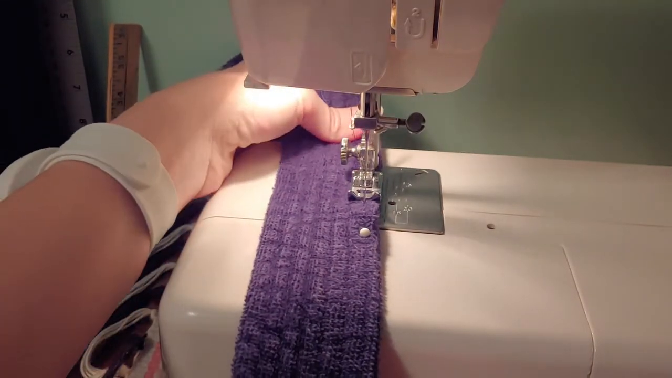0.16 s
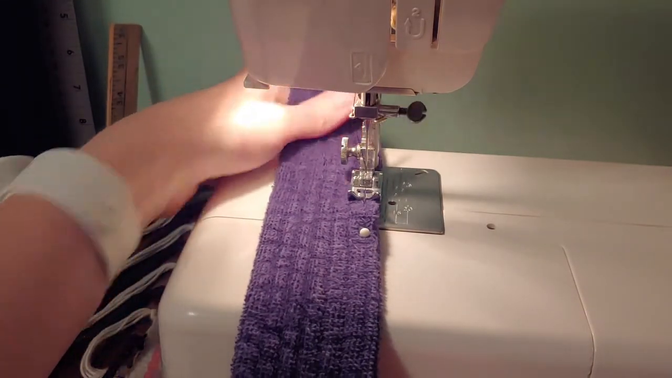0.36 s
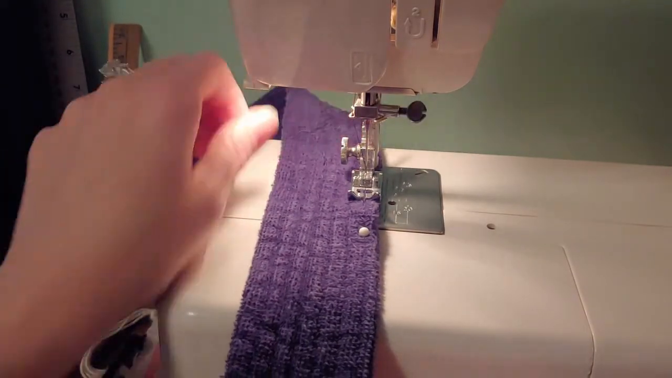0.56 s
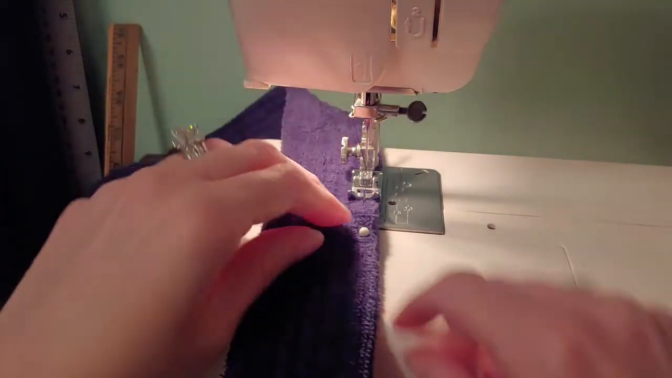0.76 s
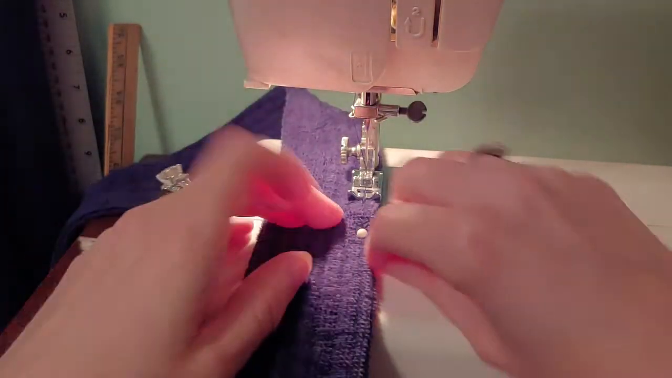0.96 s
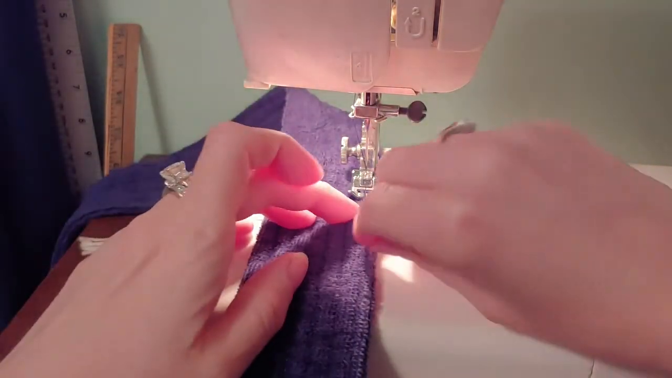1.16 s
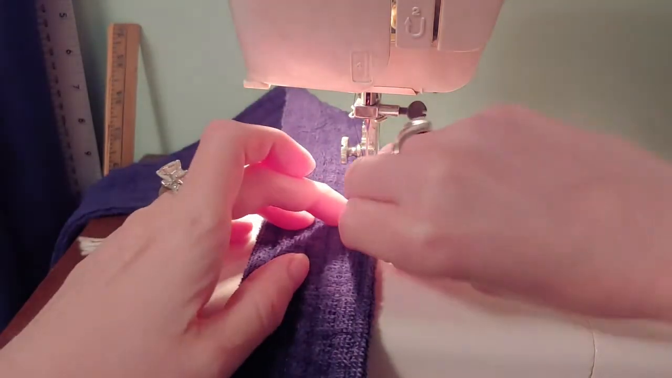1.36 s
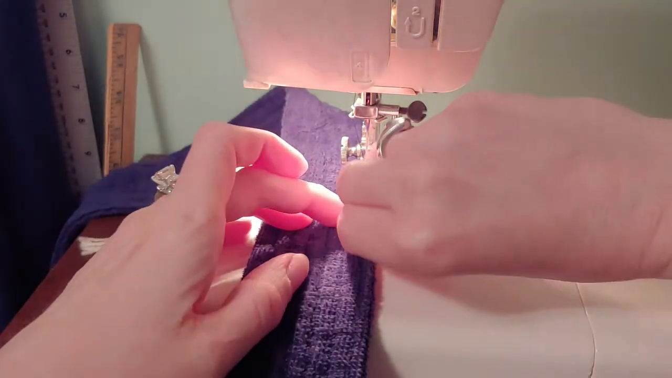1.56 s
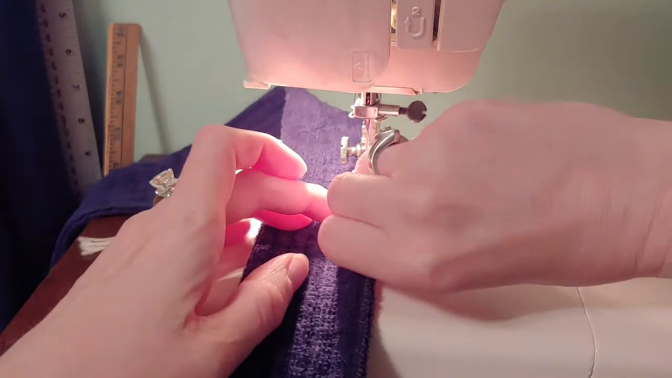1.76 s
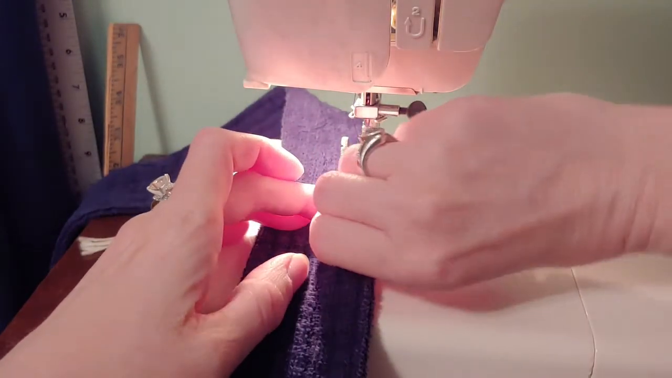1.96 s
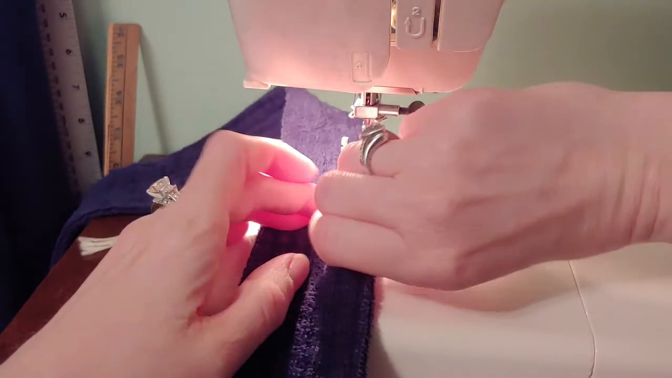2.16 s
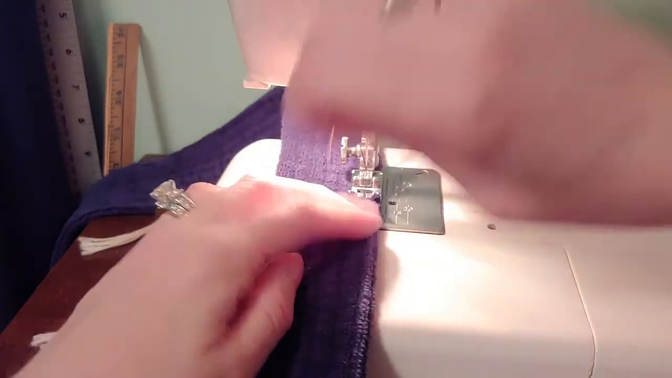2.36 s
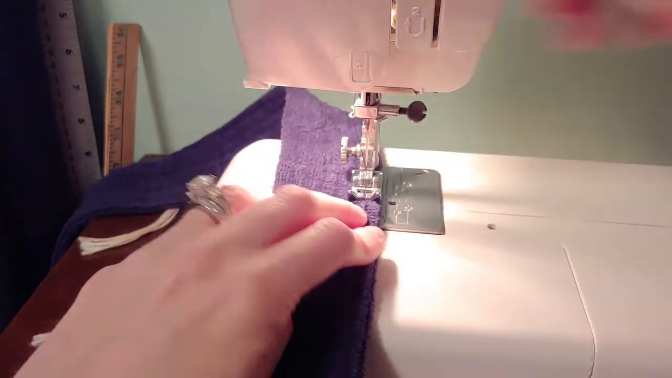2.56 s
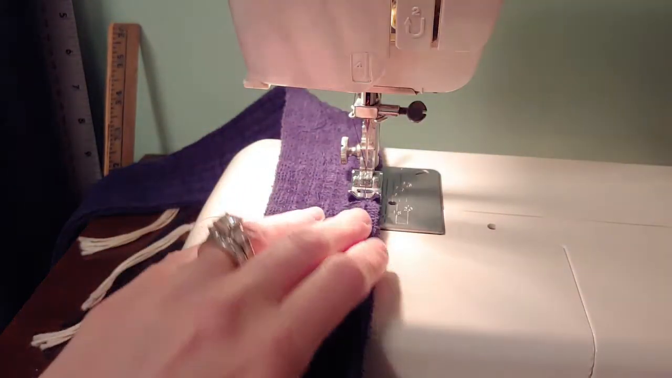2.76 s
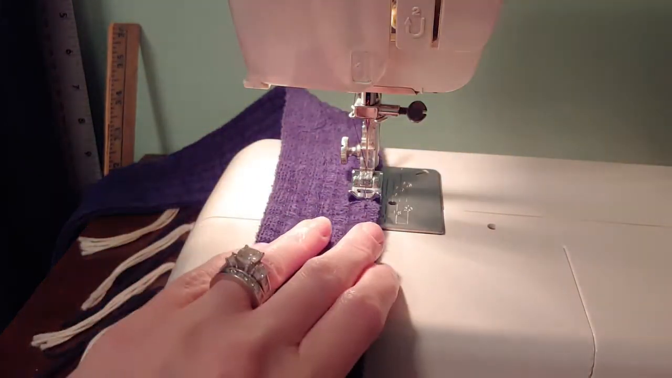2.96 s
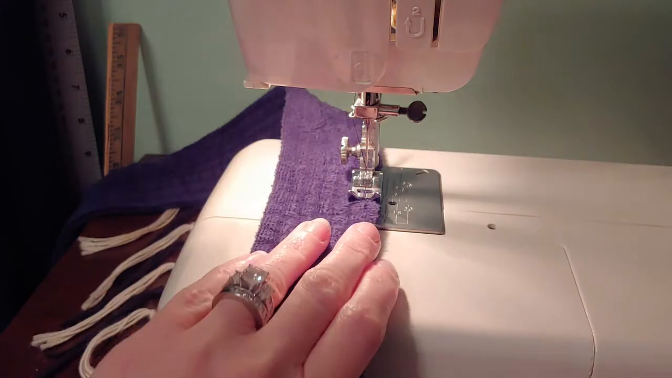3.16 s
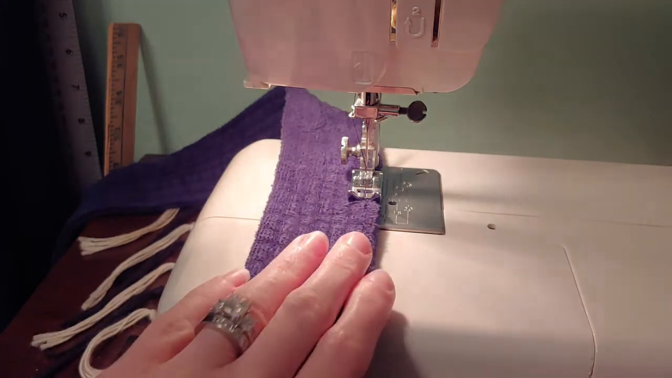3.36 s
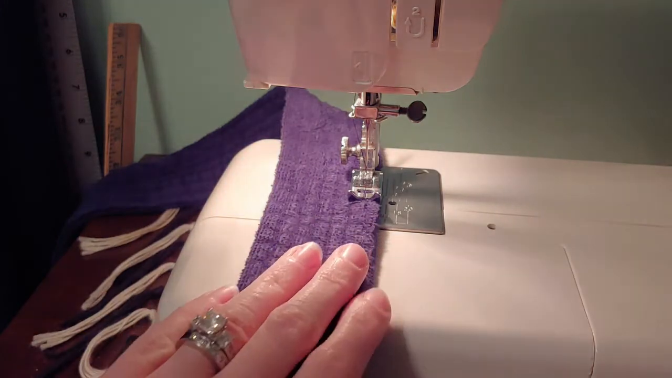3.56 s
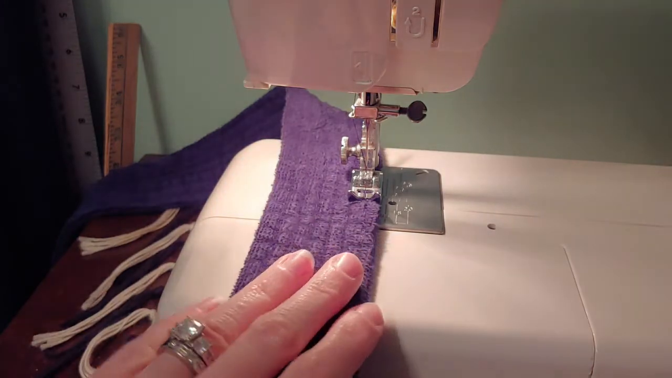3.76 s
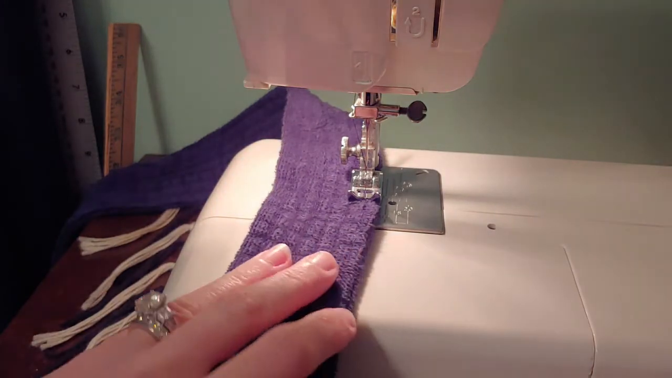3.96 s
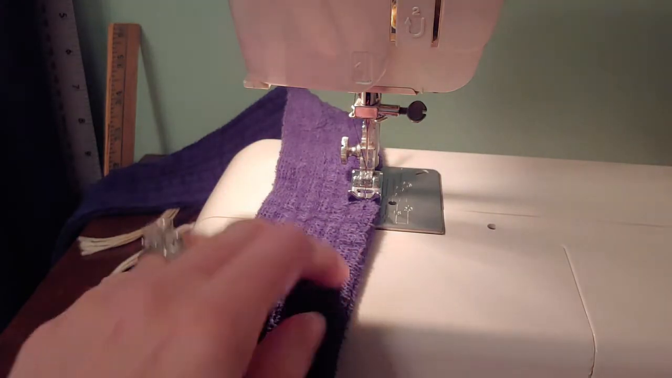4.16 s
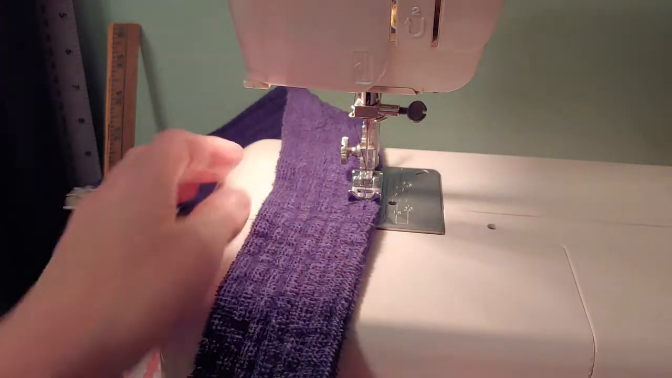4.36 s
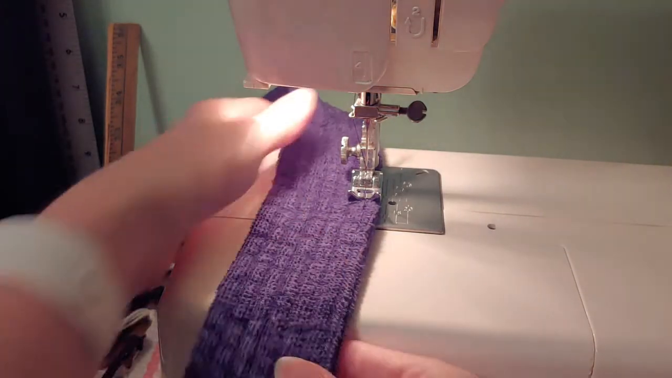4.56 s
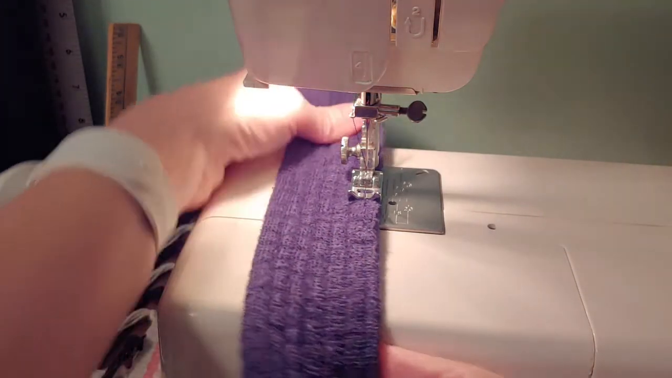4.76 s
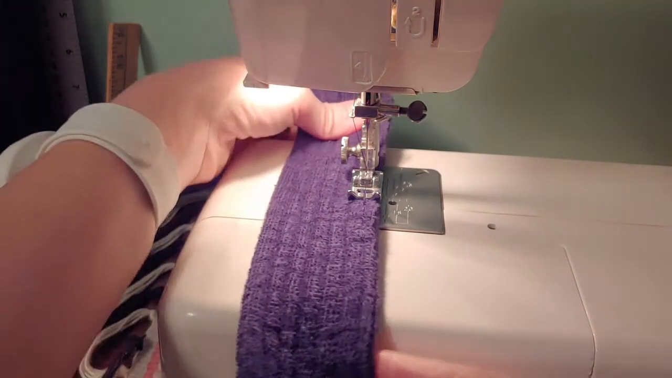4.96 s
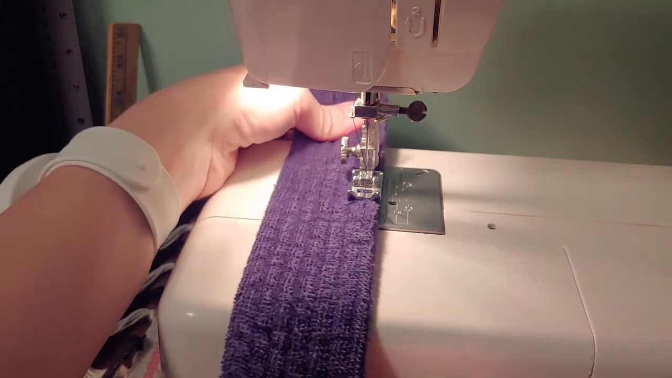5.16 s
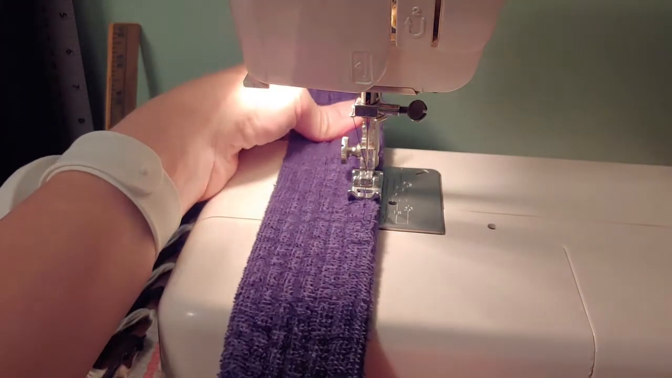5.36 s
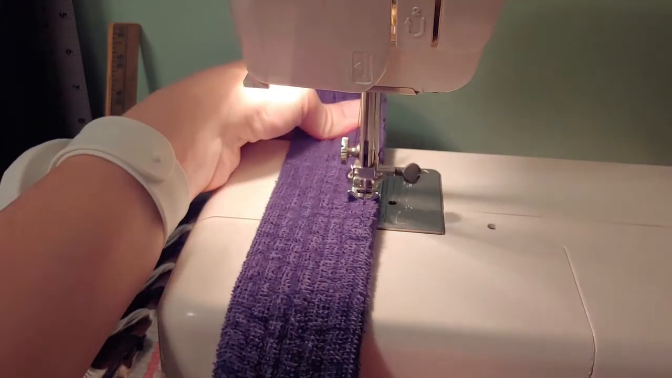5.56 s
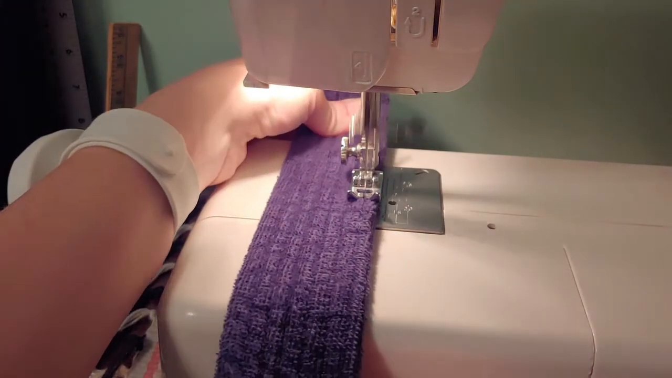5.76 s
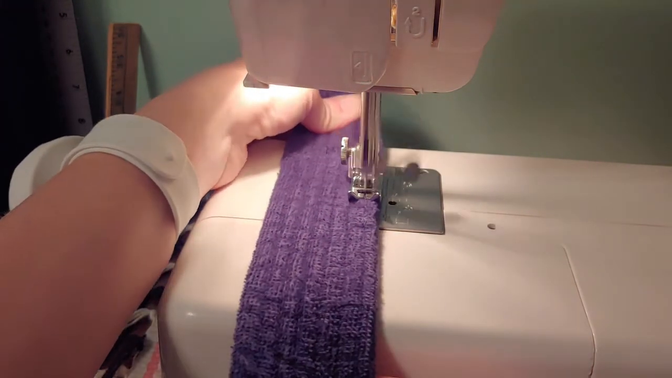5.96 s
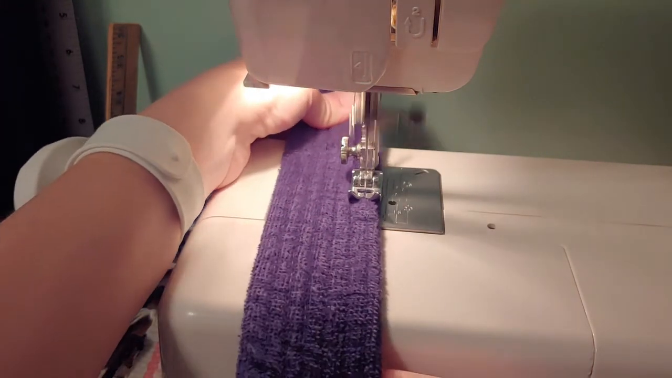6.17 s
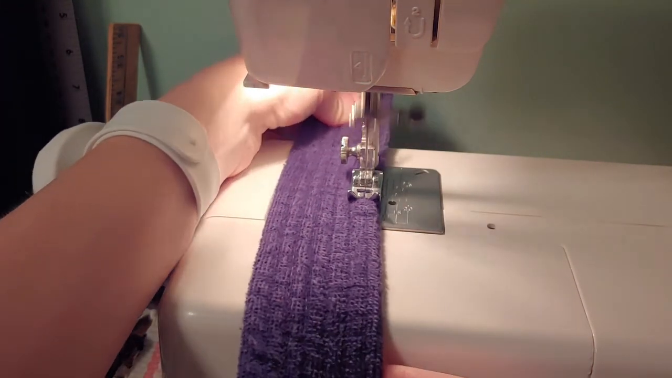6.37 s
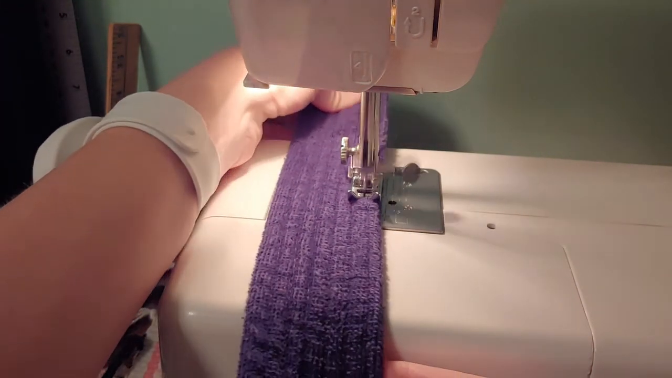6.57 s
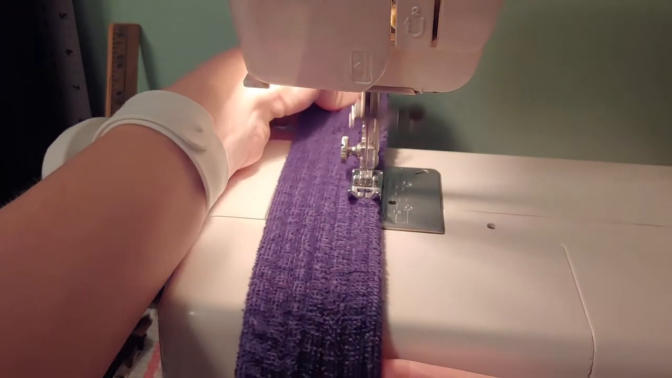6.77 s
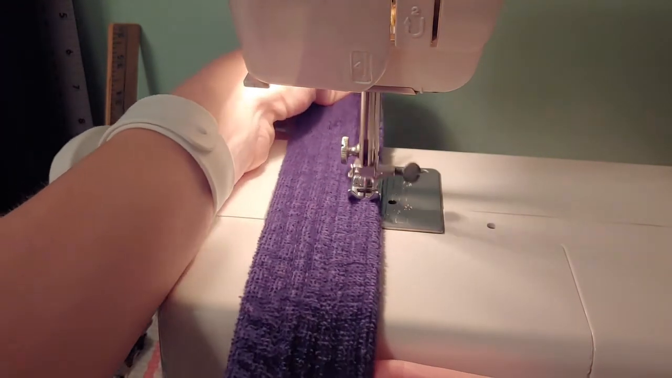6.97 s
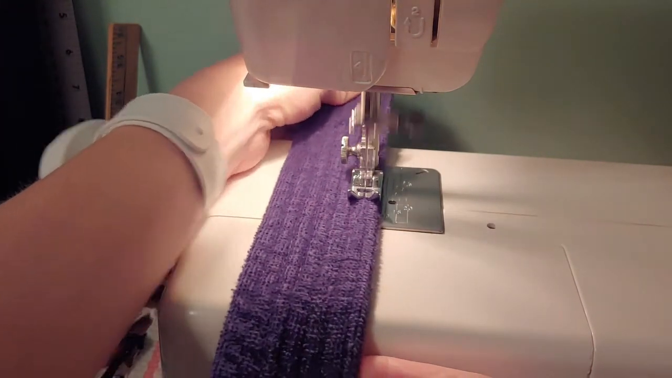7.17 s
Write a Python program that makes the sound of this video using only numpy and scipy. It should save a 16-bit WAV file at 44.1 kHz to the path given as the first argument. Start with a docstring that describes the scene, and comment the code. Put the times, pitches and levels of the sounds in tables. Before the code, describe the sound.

An electric sewing machine close to the microphone in a small quiet room. Its motor gives a short strained buzz, ending with a hard clack. Hands then knock the casing, bump the table and brush cloth softly, with a tiny bright rattle of pins. A lever snaps sharply, and after a pause the motor growls up into fast, loud, clanking stitches that continue to the end.

```python
"""A household sewing machine on a table, heard from close by in a quiet room.
Its motor buzzes once without turning, then later strains, runs up and stitches: magnetic pulls and
rough gears shake the casing, the table thumps and metal parts clack, click and knock every turn.
Before that, hands knock the casing, brush cloth, bump the table, rattle pins in a dish and snap a lever.
Blows are noise bursts through the casing's resonances; cloth and room air are coloured noise."""
import sys
import numpy as np
from scipy import signal
from scipy.fft import rfft, irfft, next_fast_len
from scipy.io import wavfile
from scipy.ndimage import uniform_filter1d

SR = 44100
rng = np.random.default_rng(int(sys.argv[2]) if len(sys.argv) > 2 else 0)


def store_wav(level_fs):
    """Save 16-bit WAV to argv[1]."""
    pcm = np.round(np.clip(np.atleast_2d(level_fs), -1, 1) * 32767)
    wavfile.write(sys.argv[1], SR, pcm.T.astype(np.int16))


N = 318402
SIZE = next_fast_len(N + SR)   # FFT length, with space for echoes after the end
HZ = np.maximum(np.arange(SIZE // 2 + 1) * SR / SIZE, 1)   # frequency of every FFT bin

# difference between left and right, against the middle: (frequency [Hz], level [dB])
WIDTH = [(60, -9), (110, -34.5), (200, -11.5), (380, -12.5), (700, -3), (1290, -2.5), (2380, -0.5),
         (4400, -1), (8120, 0), (15000, -1)]
# one row a stitch: (needle bar clack [s], its treble [dB], its low part [dB], chatter around it [dB],
# table thump peak [dB], hook click after the clack [s], hook click [dB], feed knock [dB]);
# all but the thump are levels to which each kind of contact adds its own band levels
STITCHES = [(5.5083, -35, -15.5, -33, -43, 0.052, -28, -18),
            (5.6323, -12, -10.5, -12, -11, 0.061, -18.5, -20),
            (5.7941, -10.5, -9, -13, -2.5, 0.035, -17, -22),
            (5.9266, -11, -8.5, -14.5, -3, 0.038, -13, -24), (6.0472, -11, -8, -45, -11, 0.034, -11, -29),
            (6.1635, -10.5, -7, -29, -3, 0.031, -11.5, -27), (6.2724, -9, -6, -19, -4, 0.035, -10.5, -15),
            (6.3901, -7, -11, -33, -4.5, 0.044, -42, -14),
            (6.5106, -12.5, -2.5, -13, -3, 0.039, -10.5, -6.5),
            (6.6422, -8.5, -5, -43, -12.5, .041, -8.5, -8), (6.778, -10.5, -21, -13.5, -9, 0.04, -8.5, -7),
            (6.9204, -10, -7, -14.5, -4, 0.04, -14, -6.5),
            (7.0646, -9.5, -0.5, -17.5, -5.5, 0.041, -10, -10.5),
            (7.2134, -6.5, 7, -32, -10, 0.057, -40, -20)]


def amp(db):
    """Gain of a dB value."""
    return 10 ** (np.asarray(db) / 20)


def rms_one(x):
    """Scaled to rms 1."""
    return x / np.sqrt(np.mean(x ** 2) + 1e-20)


def at_hz(points):
    """A (frequency, value) table read at every FFT bin, straight lines over log frequency."""
    hz, value = np.array(points).T
    return np.interp(np.log(HZ), np.log(hz), value)


def through(x, response):
    """Filtered by a frequency response."""
    return irfft(rfft(x, SIZE) * response, SIZE)[..., :N]


def band(x, low_hz, high_hz):
    """Butterworth band-pass."""
    return signal.sosfilt(signal.butter(2, [low_hz, high_hz], "band", fs=SR, output="sos"), x)


def resonance(hz, width_hz, at=HZ):
    """Second-order band-pass response of one ringing part, gain 1 on top."""
    return 1 / (1 + 1j * (at ** 2 - hz ** 2) / (at * width_hz))


def modes(table, at=HZ):
    """Several resonances side by side, signs alternating."""
    return sum((-1) ** k * amp(db) * resonance(hz, width, at) for k, (hz, width, db) in enumerate(table))


def casing(at=HZ):
    """The machine's casing rings at its modes, over a smooth part that dulls at the top."""
    # casing and frame modes: (frequency [Hz], width [Hz], level [dB])
    casing_modes = [(121, 26.4, 4), (299, 22.2, 11.5), (356.5, 69, 1.5), (409.2, 55.5, 6),
                    (494.5, 67, -1.5), (552, 32, 2.5), (617, 5.7, -10), (741, 35, -15), (976, 79, -9),
                    (1212, 64, -0.5), (1234, 140, -9), (1448, 79, -8), (1482, 68, -7.5), (1845, 70, -1.5),
                    (1886, 68, -4), (2121, 56, -4.5), (2340, 36, -29.5), (2770, 50, -6.5),
                    (3150, 32, -16.5), (3670, 17, -4), (3841, 70, -7.5), (3788, 70, -4), (4210, 94, -20),
                    (4996, 220, -5), (5960, 14, -14)]
    between_db, top_hz = -11.5, 7300
    return modes(casing_modes, at) + amp(between_db) / (1 + 1j * at / top_hz)


def drift(rate_hz):
    """Slow random wandering with spread 1; a higher rate wanders faster."""
    knots_per_s = 400
    knots = rng.standard_normal(int(N / SR * knots_per_s) + 2)
    r = np.exp(-2 * np.pi * rate_hz / knots_per_s)
    slow = rms_one(signal.lfilter([1], [1, -2 * r, r * r], knots))
    return np.interp(np.arange(N) / SR * knots_per_s, np.arange(len(knots)), slow)


def spells(table, rise_s, fall_s):
    """Gain that swells in before each start, holds and fades after each end."""
    t = np.arange(N) / SR
    gain = np.zeros(N)
    for start, end, db in table:
        before = np.maximum(start - t, 0) / rise_s
        after = np.maximum(t - end, 0) / fall_s
        gain += amp(db) * np.exp(-before ** 2 - after ** 2)
    return gain


def random_taps(per_s, spread_db):
    """Single-sample taps at random times, with uneven strength."""
    return (rng.random(N) < per_s / SR) * amp(spread_db * np.minimum(rng.exponential(1, N), 4))


def swings(table):
    """A soft push sets the table swinging for a few cycles, its pitch rising a little."""
    push_s, lag_s, swing_s = 0.006, 0.002, 0.02
    t = np.arange(SR // 4) / SR
    out = np.zeros(N + SR)
    for s, db, hz in table:
        push = 1 - np.exp(-(t / push_s) ** 2)
        dying = np.exp(-(t / swing_s) ** 2) + 0.24 * np.exp(-t / 0.034)
        # the pitch starts at 0.91 of hz and rises through it
        swing = -np.sin(2 * np.pi * hz * 0.91 * t * (1 + 4.0 * t)) * push * dying
        out[round((s + lag_s) * SR):][:len(t)] += amp(db) * swing / np.abs(swing).max()
    return out[:N]


def strikes(table, crack, crack_s, favour_db):
    """Each contact is a crack and a dying rattle in the casing, with its own weight band by band."""
    # low, middle, high and top band: (lower edge [Hz], upper edge [Hz])
    band_edges = [(260, 830), (700, 2730), (2500, 8800), (8500, 16500)]
    # ring time as a multiple of the contact's t60, for those bands and the part above the middle mode
    band_ring = [1.3, 1.2, 0.97, 0.75, 0.96]
    # frame mode that every blow favours: (frequency [Hz], width [Hz], level [dB])
    frame_ring = (4200, 200, -12)
    favoured_width_hz = 89
    size = 8192
    t = np.arange(size) / SR
    out = np.zeros((2, N + size))
    at = np.maximum(np.arange(size // 2 + 1) * SR / size, 1)
    shell = casing(at)
    for row in table:
        s, low_db, middle_db, high_db, top_db, rise, t60, low_hz, middle_hz, pan_db = row
        noise = rng.standard_normal(size)
        # where it is struck decides which modes stand out
        favoured = [(low_hz, favoured_width_hz, 0), (middle_hz, favoured_width_hz, 0), frame_ring]
        body = shell * (1 + amp(favour_db) * modes(favoured, at))
        onset = 1 - np.exp(-t / max(rise, 1e-4))
        # the middle band is split a little above its favoured mode
        bottom, (start, end), *upper = band_edges
        split = min(1.207 * middle_hz, 0.9 * end)
        edges = [bottom, (start, split), *upper, (split, end)]
        above_mode_db = (middle_db + high_db) / 2 - 2.5
        weights_db = [low_db, middle_db, high_db, top_db, above_mode_db]
        hit = 0
        for (low, high), ring, weight_db in zip(edges, band_ring, weights_db):
            rattle = amp(-60 * t / (max(t60, 0.005) * ring))
            push = noise * onset * (rattle + crack * np.exp(-t / crack_s))
            ringing = irfft(rfft(push) * body, size)
            part = band(band(ringing, low, high), low * 0.8, high * 1.2)
            hit = hit + amp(weight_db) * part / np.abs(part).max()
        first = round(s * SR)
        out[:, first:first + size] += hit * amp([[pan_db / 2], [-pan_db / 2]])
    return out[:, :N]


def air():
    """Room rumble is coloured noise; wavering appliance hum is a few sines that drift."""
    # rumble colour: (frequency [Hz], level [dB])
    air_colour = [(12, -34), (20, -0.5), (60, -0.5), (177, -4), (248, -7.5), (410, -17), (573, -22),
                  (2190, -31.5), (6180, -38.5), (7100, -72), (8880, -43.5), (12100, -46.5), (16000, -48.5)]
    # hum: (frequency [Hz], typical rms level [dB])
    hum_tones = [(59.2, -64), (96.9, -74), (177.6, -73), (355.3, -74.5), (414.5, -75)]
    air_db = -63.5
    t = np.arange(N) / SR
    rumble = amp(air_db) * rms_one(through(rng.standard_normal(N), amp(at_hz(air_colour))))
    hum = np.zeros(N)
    for hz, db in hum_tones:
        level = np.sqrt(2) * amp(db + 2.0 * drift(2.7))
        hum += level * np.sin(2 * np.pi * hz * t + 0.5 * drift(0.56))
    return rumble + hum


def cloth():
    """Brushing cloth, and the noise dying away after the lever snaps: swells of fine uneven noise."""
    # swells of soft broadband noise: (start [s], end [s], level [dB])
    swells = [(.24, .36, -69), (.45, .52, -56), (.82, 1.07, -79), (1.5, 1.54, -85), (2.67, 2.7, -75),
              (2.85, 2.99, -70), (3.17, 3.25, -79), (3.34, 3.46, -72), (3.56, 3.6, -76), (3.7, 3.85, -74.5),
              (3.97, 4.07, -75), (4.29, 4.31, -80), (4.72, 4.85, -63.5), (4.94, 4.97, -65.5),
              (5.23, 5.27, -68), (5.33, 5.36, -74)]
    # colour of the noise: (frequency [Hz], density [dB per Hz])
    cloth_colour = [(290, -19.5), (500, -4), (570, -8.5), (649, -10.5), (1460, -14.5), (1590, -13.5),
                    (6140, -19), (6990, -23.5), (8570, -26), (16000, -33.5)]
    rest_db = -81   # faint constant level beneath the swells
    level = amp(rest_db) + spells(swells, rise_s=0.074, fall_s=0.028)
    brushing = rms_one(through(rng.standard_normal(N), amp(at_hz(cloth_colour))))
    return level * amp(0.72 * drift(18.0)) * brushing


def fidget():
    """Tiny random fingertip taps ring one hollow mode of the casing."""
    # spells of fidgeting: (start [s], end [s], level [dB])
    fidgeting = [(.82, 1.37, -76.5), (1.47, 1.56, -77.5)]
    mode_hz, mode_width_hz = 1240, 93
    taps = random_taps(per_s=90, spread_db=3.6)
    ringing = rms_one(through(taps, resonance(mode_hz, mode_width_hz) ** 2))
    return spells(fidgeting, rise_s=0.037, fall_s=0.054) * ringing


def pins():
    """Pins rattling in a dish to the left: short bright noise through the dish's modes."""
    # rattles: (time [s], starting level [dB], time to fall by 60 dB [s])
    pin_rattles = [(3.6062, -43.5, 0.016), (3.666, -51, 0.18), (3.687, -30.5, 0.11), (3.6918, -33, 0.036),
                   (3.697, -31.5, 0.023), (3.704, -38, 0.03), (3.7204, -45, 0.049)]
    # modes of the dish: (frequency [Hz], width [Hz], level [dB])
    dish_modes = [(2900, 250, -8), (3900, 240, 0), (5460, 700, 3), (6400, 500, 0), (6700, 220, -7.5),
                  (7760, 1200, -2), (9800, 860, -1), (11500, 270, 4.5), (13400, 2000, -11)]
    pan_db, low_hz = 9.5, 2600   # left above right; bottom of the rattle
    t = np.arange(N) / SR
    shake = np.zeros(N)
    for s, db, t60 in pin_rattles:
        shake += (t >= s) * amp(db - 60 * np.maximum(t - s, 0) / max(t60, 0.004))
    rattle = band(through(rng.standard_normal(N), modes(dish_modes) + amp(-34.0)), low_hz, 18000)
    return shake * rms_one(rattle) * amp([[pan_db / 2], [-pan_db / 2]])


def bumps():
    """Arms bump the table dully, and each bump sets it swinging."""
    # bumps: (time [s], peak level [dB], nominal pitch [Hz]);
    # the swing starts at 0.91 of the nominal pitch and rises
    arm_bumps = [(0.36, -32.5, 129), (0.52, -39.5, 89), (0.972, -30, 166), (1.029, -36.5, 222),
                 (1.267, -50, 54.3), (1.646, -40, 148), (1.751, -57, 70.0), (2.307, -43, 180),
                 (2.599, -52, 57.6), (3.328, -46.5, 138), (3.666, -43, 60), (3.72, -53, 56),
                 (4.517, -47.5, 147), (4.741, -32, 169), (5.306, -35.5, 152)]
    return swings(arm_bumps)


def knocks():
    """Hands, a ring and the lever strike the casing: a strong short crack, then a brief ring."""
    # blows: (time [s], low band [dB], middle band [dB], high band [dB],
    # loudest low mode [Hz], loudest middle mode [Hz], left above right [dB])
    blows = [(.095, -32.5, -68, -76, 296, 950, 0), (0.152, -32, -40, -56, 467, 969, -4),
             (0.181, -40, -68, -42, 420, 1900, 0), (0.271, -38, -47, -39, 480, 1910, 0),
             (0.414, -17, -21, -34, 483, 1640, 0.5), (.431, -29.5, -29, -37, 536, 1640, 3),
             (.446, -33, -29, -37, 480, 1520, 0), (.895, -36, -42.5, -55.5, 450, 1210, 2),
             (.909, -35.5, -37.5, -50.5, 530, 1260, -2), (0.954, -25.5, -33, -59, 515, 1240, -2),
             (0.97, -20.5, -21.5, -31.5, 394, 986, 2), (.992, -30, -32.5, -40.5, 490, 1250, -3),
             (1.018, -43, -62, -73, 417, 953, 6), (1.041, -47, -53, -77, 480, 1220, 3.5),
             (1.266, -34, -40, -67, 470, 1240, -1), (1.462, -53, -73, -78, 417, 1240, -1),
             (1.492, -53, -60.5, -76, 415, 1270, 1), (1.567, -52, -65, -68, 490, 1090, 2.1),
             (1.638, -35.5, -70, -59, 535, 960, 2), (1.647, -36, -43, -70, 300, 1140, 3),
             (2.2472, -43, -36, -39.5, 328, 1730, -2.5), (2.256, -41, -37, -42, 490, 2200, 2),
             (2.318, -39.5, -47, -61.5, 294, 1180, -1), (2.599, -54, -62.5, -78, 318, 1650, -1.1),
             (3.285, -53.5, -75, -72, 270, 2240, -3.5), (4.057, -40.5, -55, -75, 530, 1200, 0),
             (4.494, -57, -59.5, -66, 417, 894, -5), (4.531, -56, -65, -67, 417, 942, -3),
             (4.7363, -11, -6.5, -11.5, 470, 1450, -1.5), (4.743, -17, -11.5, -24.5, 434, 1620, -3),
             (4.764, -24, -34, -31, 416, 1420, 4), (4.953, -65, -64, -51, 428, 1240, 14),
             (5.18, -56, -54, -68.5, 247, 794, 7), (5.313, -39.5, -66, -57, 371, 1040, 5)]
    top_db, rise_s, t60_s = -19, 0.0002, 0.043   # top band above the high one; t60 before band ring
    rows = []
    for s, low_db, middle_db, high_db, *rest in blows:
        rows.append((s, low_db, middle_db, high_db, high_db + top_db, rise_s, t60_s, *rest))
    return strikes(rows, crack=4.9, crack_s=0.00081, favour_db=13.0)


def growl(pull, locked):
    """Regular magnetic pulls and irregular rumble shake the casing's low modes."""
    body = casing()
    buzz = rms_one(band(through(pull * amp(3.0 * drift(40.0)), body), 95, 700))
    rough = rng.standard_normal(N) * amp(4.7 * drift(41.0))
    rumble = rms_one(band(through(rough, body + 0.4), 73, 607))
    return np.sqrt(locked) * buzz + np.sqrt(1 - locked) * rumble


def whirr(pull, locked, turning):
    """Rough gear teeth hiss and rattle in their play, louder as the needle drives through."""
    # colour of the gear noise: (frequency [Hz], density [dB per Hz])
    whirr_colour = [(290, -8.5), (500, 7.5), (718, -4), (807, -5.5), (1950, -11.5), (2360, -16.5),
                    (4870, -18), (5630, -22.5), (7100, -29.5), (8690, -30), (11600, -33), (16000, -58)]
    stroke_db, stroke_lead_s, stroke_s = 6.5, 0.0031, 0.015   # load peaks just before each clack
    rattle_db, dull_hz = -8.5, 2460   # rattle level above the hiss; dulling before the shaft turns
    t = np.arange(N) / SR
    load = sum(np.exp(-((t - row[0] + stroke_lead_s) / stroke_s) ** 2) for row in STITCHES)
    teeth = amp(stroke_db * load) * rng.standard_normal(N)
    teeth = teeth * (1 + 2.2 * locked * pull) * amp(2.0 * drift(45.0))
    body = casing()
    hiss = rms_one(through(teeth, amp(at_hz(whirr_colour)) * (1 + 0.95 * body)))
    play = random_taps(per_s=140, spread_db=3.9) * rng.choice([-1, 1], N)
    bright = hiss + amp(rattle_db) * rms_one(band(through(play, body), 360, 2420))
    dull = through(bright, 1 / (1 + 1j * HZ / dull_hz))
    return (1 - turning) * dull + turning * bright


def singing(pull):
    """A few loose parts ring while the motor strains, driven by noise that swells with each pull."""
    # loose parts: (frequency [Hz], width [Hz], level [dB])
    loose_parts = [(745, 40, -6), (1000, 50, -5), (1500, 50, -8), (1940, 130, 0), (2220, 50, -4),
                   (2670, 60, -5), (3390, 55, -8), (4260, 110, -16)]
    # spells of singing: (start [s], end [s], level [dB])
    sings = [(.18, .33, -57), (5.315, 5.39, -56), (5.4, 5.49, -64)]
    tone = rms_one(through(rng.standard_normal(N) * (1 + pull), modes(loose_parts) ** 2))
    return tone * spells(sings, rise_s=0.004, fall_s=0.024)


def motor():
    """Magnetic pulls at twice the mains rate and rough gear contact shake the casing."""
    # two spells of straining before the shaft turns: (time [s], low growl [dB], gear whirr [dB])
    strain = [
        [(0.088, -41.5, -70), (0.096, -38.5, -95), (0.148, -38.5, -49), (0.182, -32, -30), (0.204, -34, -33.5),
         (0.308, -32.5, -37), (0.4, -42.5, -56), (0.41, -30.5, -58)],
        [(5.3, -47, -78), (5.316, -39, -70), (5.372, -36, -66), (5.486, -28.5, -42), (5.5, -21.5, -44)],
    ]
    # motor running: (time [s], low growl [dB], gear whirr [dB])
    run = [(5.51, -24.5, -34.5), (5.562, -19, -22), (5.68, -18, -24.5), (5.738, -22, -22.5),
           (5.972, -22.5, -24), (6.186, -18.5, -21.5), (6.562, -25.5, -22), (6.934, -21.5, -23),
           (7.22, -25.5, -24)]
    pull_hz, spin_up_s = 122.1, 0.063   # two pulls a mains cycle; time for the whirr to brighten
    t = np.arange(N) / SR
    s, growl_db, whirr_db = np.transpose(np.vstack(strain + [run]))
    on = sum((t > part[0][0]) & (t < part[-1][0] + 0.011) for part in strain + [run])
    on = uniform_filter1d(np.minimum(on, 1.0), size=400)   # softens the switching
    run_start = run[0][0]
    locked = np.where(t < run_start, 0.3, 0.09)   # share of the growl's power locked to the mains
    turning = np.clip((t - run_start) / spin_up_s, 0, 1)
    cycles = pull_hz * t + 0.025 * drift(20.0)
    pull = np.exp(7.0 * (np.cos(2 * np.pi * cycles) - 1))   # one narrow pulse a cycle
    low = amp(np.interp(t, s, growl_db)) * growl(pull, locked)
    gears = amp(np.interp(t, s, whirr_db)) * whirr(pull, locked, turning)
    return singing(pull) + on * (low + gears)


def thumps():
    """The table swings just before each clack."""
    lead_s = 0.0216
    nominal_hz = 132   # the swing starts at 0.91 of it and rises
    return swings([(row[0] - lead_s, row[4], nominal_hz) for row in STITCHES])


def contact(s, db, kind):
    """One metal contact: the kind's band levels on top of db, struck at a random place."""
    low_hz, middle_hz = rng.uniform(339, 562), rng.uniform(685, 1600)   # modes it favours
    return (s, *np.add(db, kind[:4]), *kind[4:], low_hz, middle_hz, 0)


def contacts():
    """Each turn plays chatter, clack, chatter, hook click, feed knock and tick; the last stops at the clack."""
    # kinds of contact: (low, middle, high and top band above the contact's level [dB],
    # rise [s, at least 0.0001], t60 before band ring [s, at least 0.005])
    clack = (0.5, -1.6, -1, -14.5, 0.09, -0.1279)
    chatter = (8, 1.6, -4.5, -20.5, -0.16, 0.034)
    hook = (-7.5, -11.5, -1.5, -25, -0.1, -0.29)
    feed_knock = (-0.5, -8.5, -27, -35, -0.47, -0.2)
    feed_tick = (4.5, -1, -1, -16, 0.3, 0.09)
    chatter_gap_s, chatter_after_db = 0.011, -3   # later touch above the earlier
    knock_at, tick_at = 0.58, 0.73   # share of the turn after the clack
    tick_db, tick_scatter_db = -22.5, 2.5
    rows = []
    for stitch, following in zip(STITCHES, STITCHES[1:] + [None]):
        s, db, low_db, chatter_db, _, hook_lag, hook_db, feed_db = stitch
        rows.append(contact(s - chatter_gap_s, chatter_db, chatter))
        rows.append(contact(s, [low_db, db, db, db], clack))
        if following:
            turn = following[0] - s
            rows.append(contact(s + chatter_gap_s, chatter_db + chatter_after_db, chatter))
            rows.append(contact(s + hook_lag, hook_db, hook))
            rows.append(contact(s + knock_at * turn, feed_db, feed_knock))
            rows.append(contact(s + tick_at * turn, tick_db + rng.normal(0, tick_scatter_db), feed_tick))
    return strikes(rows, crack=1.5, crack_s=0.0017, favour_db=9)


def room(x):
    """A dying, dulling cloud of echoes; the two channels differ most in the treble."""
    t60_s, level_db, wall_cut_hz, low_hz = 0.26, -10, 5400, 220   # level before the filters
    t = np.arange(SR // 2) / SR
    tail = rng.standard_normal((2, len(t))) * amp(-60 * t / t60_s) * (1 - np.exp(-(t / 0.011) ** 2))
    tail = tail / np.sqrt(np.sum(tail ** 2) / 2)
    dulling = 1 / (1 + 1j * HZ / wall_cut_hz)
    low_cut = 1 / (1 - 1j * low_hz / HZ) ** 2
    mid, side = rfft(tail, SIZE) * dulling * low_cut
    side = side * amp(at_hz(WIDTH))
    return amp(level_db) * through(x, np.array([mid + side, mid - side]))


def spread(x):
    """Near reflections reach the two microphone ports unlike each other, more so in the treble."""
    # balance of the ports: (frequency [Hz], left above right [dB])
    lean = [(60, 2.5), (110, 0.5), (200, 0.5), (380, 0), (700, 4), (1290, -0.5), (2380, -7), (4400, 0),
            (8120, -6.5), (15000, 8)]
    t = np.arange(SR // 10) / SR
    near = rng.standard_normal(len(t)) * t * np.exp(-t / 0.009)
    near = near / np.sqrt(np.sum(near ** 2))
    side = through(x.mean(axis=0), rfft(near, SIZE) * amp(at_hz(WIDTH)))
    return through(x + side * [[1], [-1]], amp(at_hz(lean) * [[0.5], [-0.5]]))


def scene():
    """Room air, hands and machine, heard directly; hands and machine also echo in the room."""
    hands = cloth() + fidget() + pins() + bumps() + knocks()
    machine = motor() + thumps() + contacts()
    sources = machine + hands
    return spread(sources + air()) + room(sources.mean(axis=0))


def record(dry):
    """Port resonances colour the treble, loud peaks clip, the top is cut."""
    # treble peaks and dips of the ports: (frequency [Hz], width [Hz], level [dB])
    mic_peaks = [(7070, 370, 11), (9270, 230, -4.5), (10800, 5200, 3.5)]
    # one broad dip: (frequency [Hz], width [Hz], level [dB])
    mic_dip = (8630, 2300, -13.5)
    full_scale, cutoff_hz = 1.0, 16100
    colour = 1
    for hz, width, db in mic_peaks + [mic_dip]:
        colour = colour * (1 + (amp(db) - 1) * resonance(hz, width))
    clipped = np.clip(through(dry, colour), -full_scale, full_scale)
    return signal.sosfilt(signal.cheby2(12, 60, cutoff_hz, fs=SR, output="sos"), clipped)


dry = scene()
out = record(dry)
store_wav(out)
```